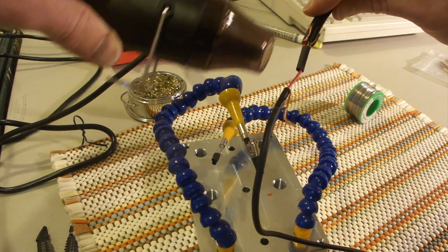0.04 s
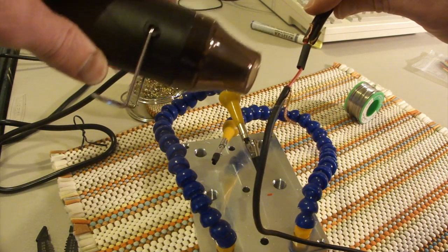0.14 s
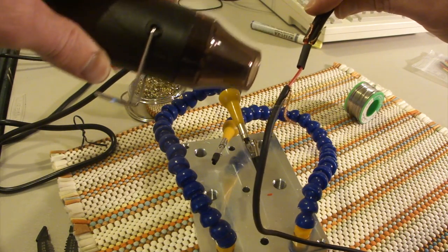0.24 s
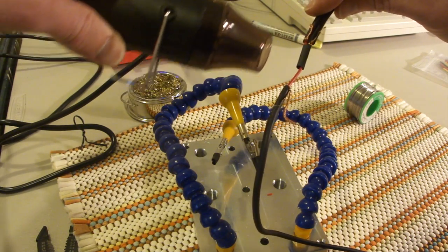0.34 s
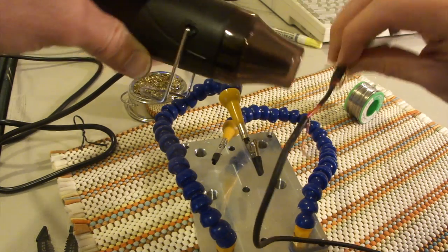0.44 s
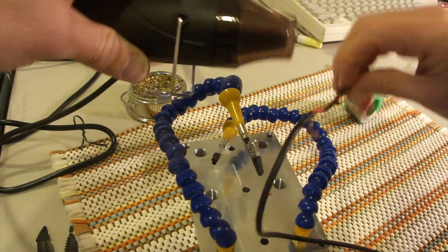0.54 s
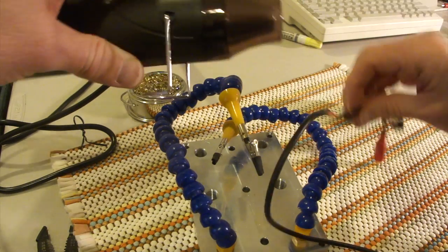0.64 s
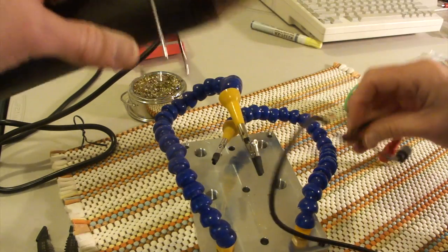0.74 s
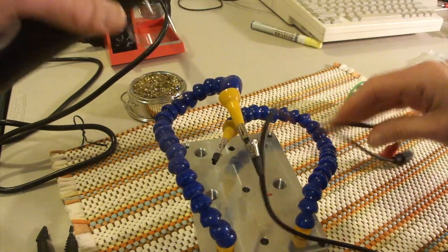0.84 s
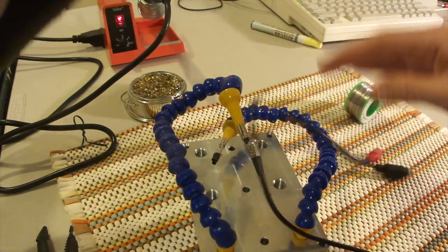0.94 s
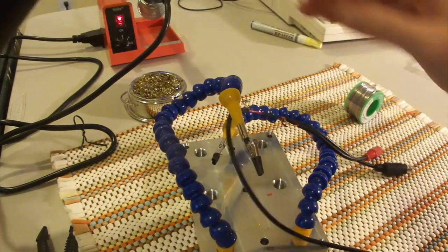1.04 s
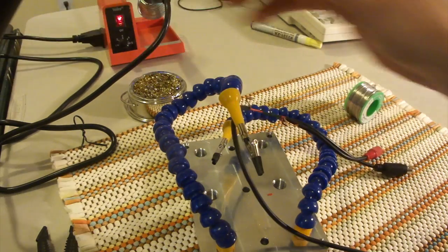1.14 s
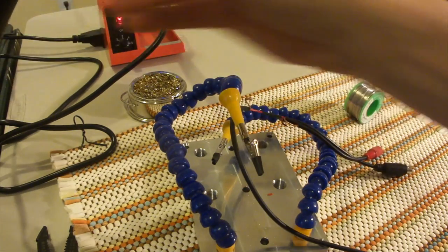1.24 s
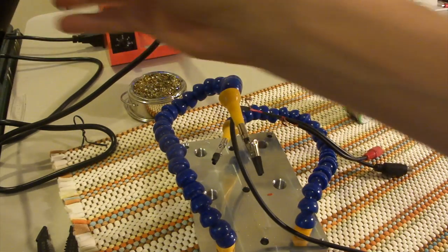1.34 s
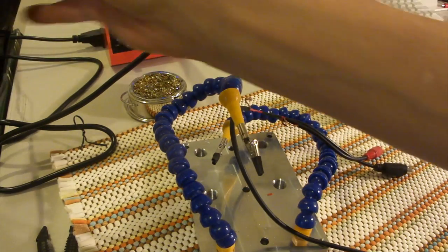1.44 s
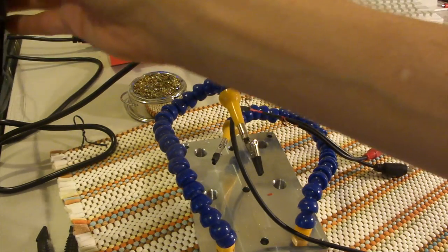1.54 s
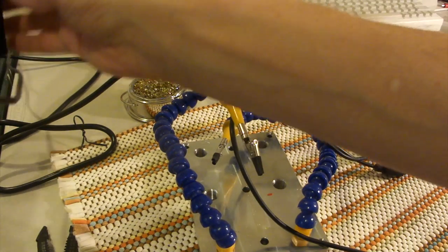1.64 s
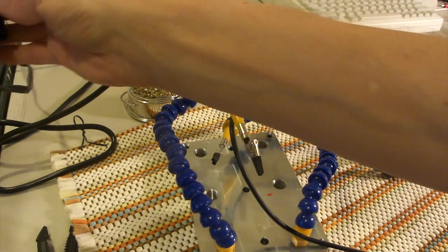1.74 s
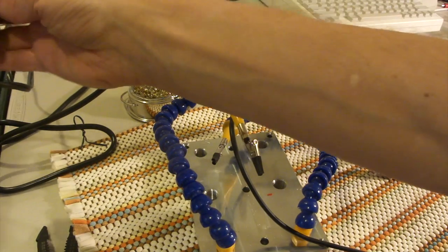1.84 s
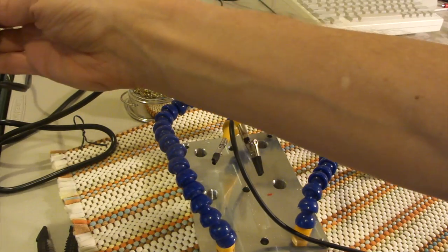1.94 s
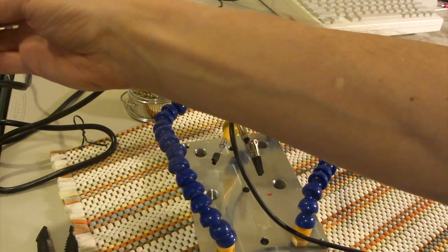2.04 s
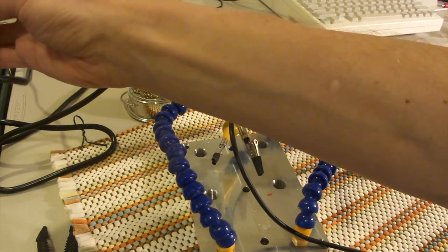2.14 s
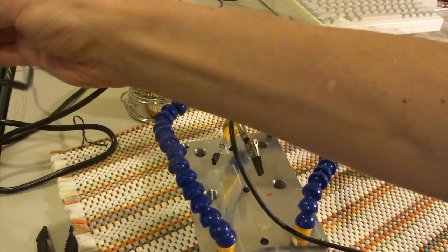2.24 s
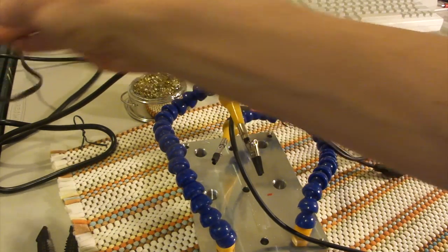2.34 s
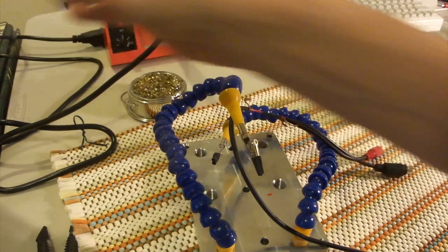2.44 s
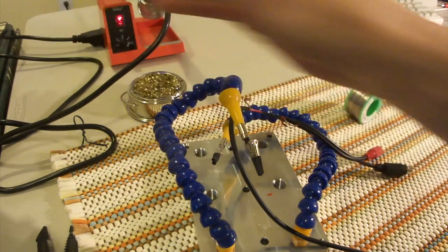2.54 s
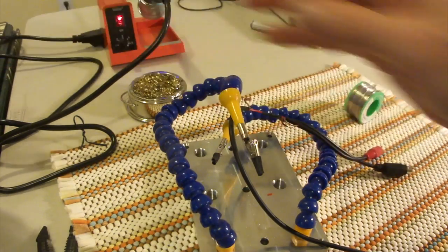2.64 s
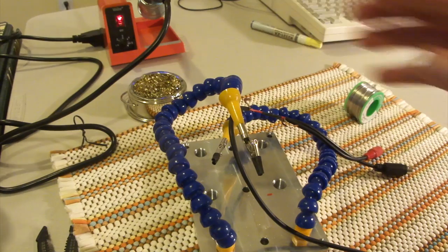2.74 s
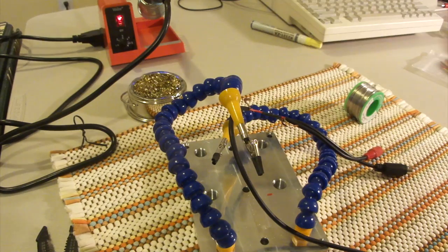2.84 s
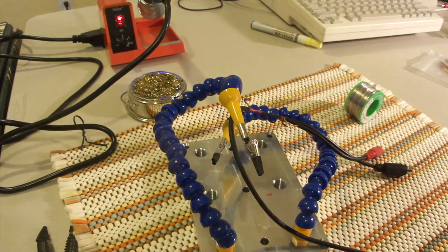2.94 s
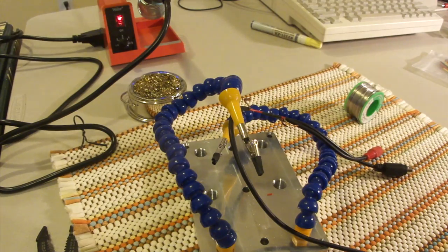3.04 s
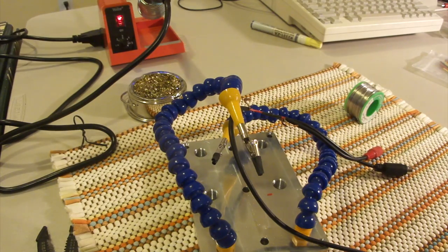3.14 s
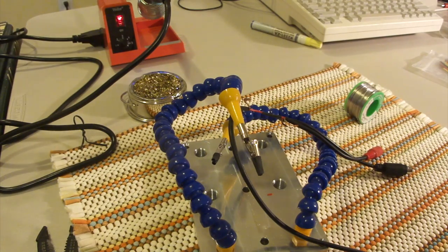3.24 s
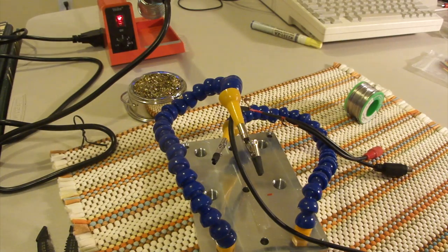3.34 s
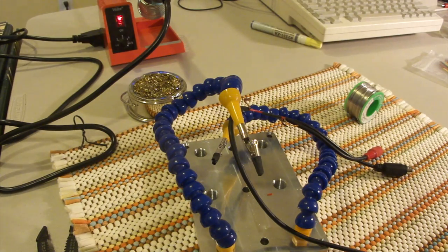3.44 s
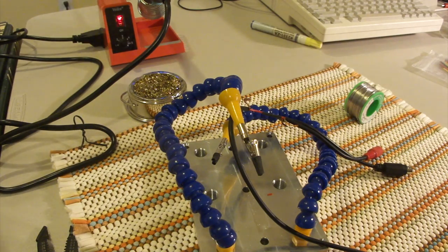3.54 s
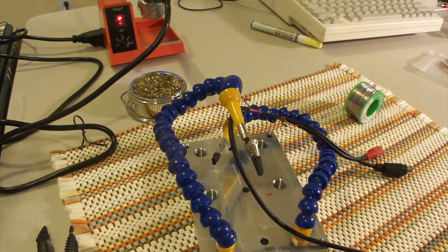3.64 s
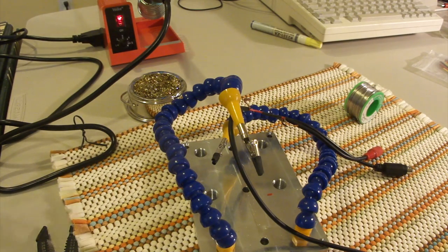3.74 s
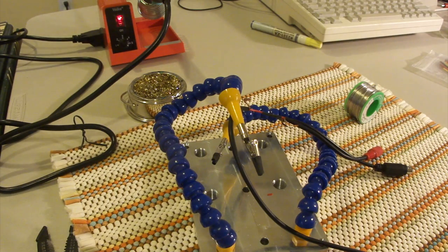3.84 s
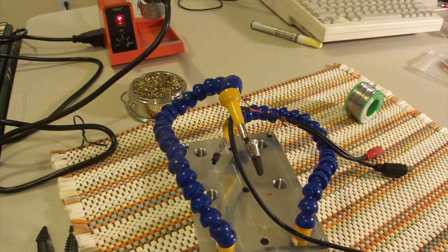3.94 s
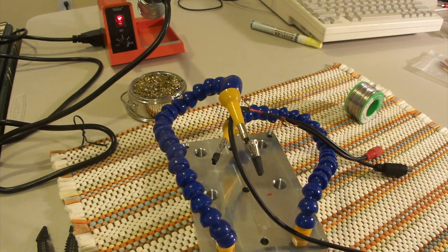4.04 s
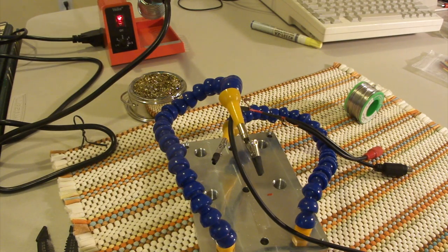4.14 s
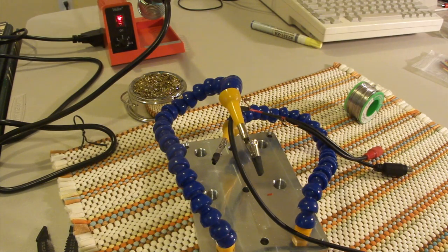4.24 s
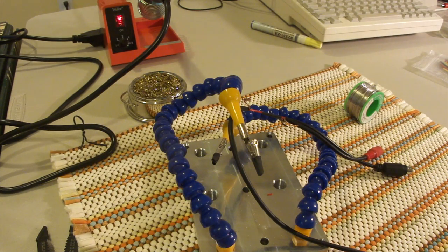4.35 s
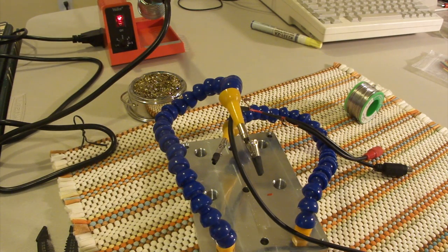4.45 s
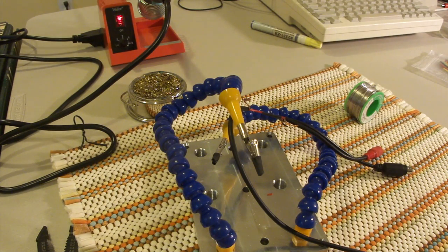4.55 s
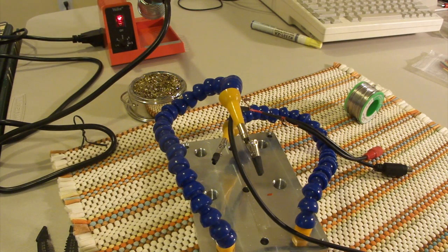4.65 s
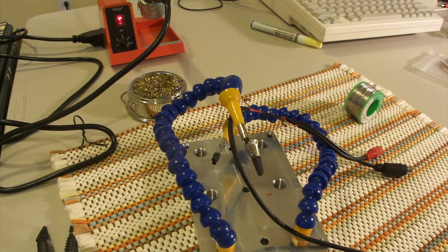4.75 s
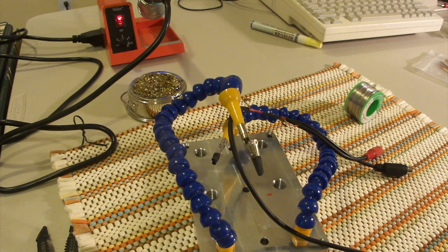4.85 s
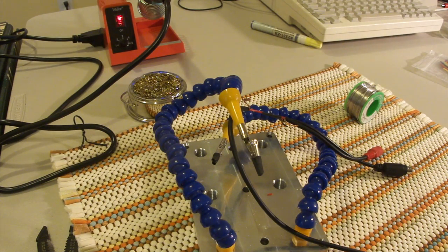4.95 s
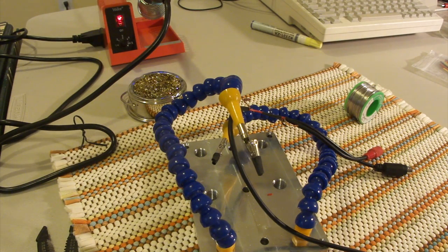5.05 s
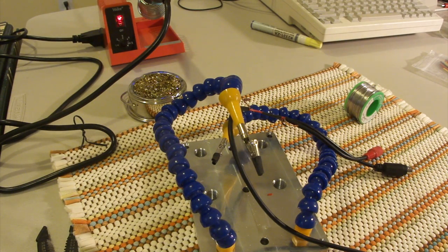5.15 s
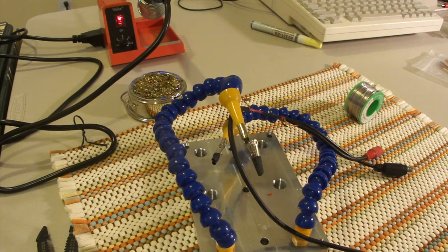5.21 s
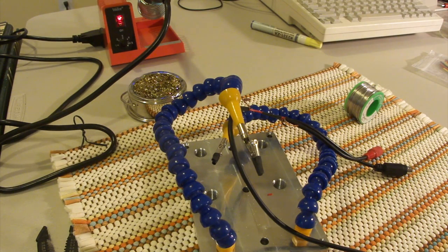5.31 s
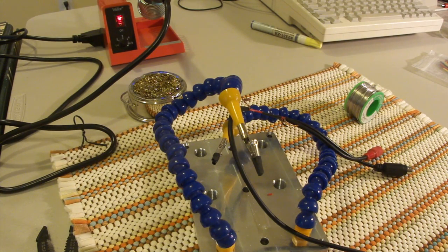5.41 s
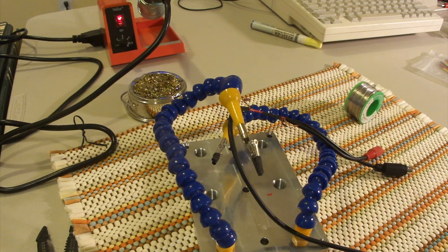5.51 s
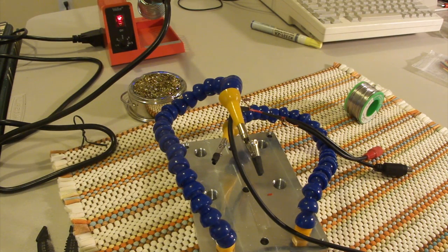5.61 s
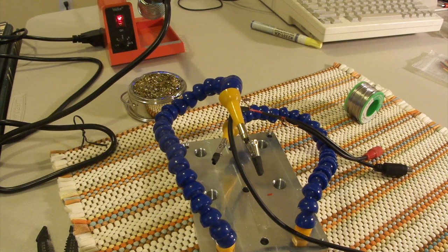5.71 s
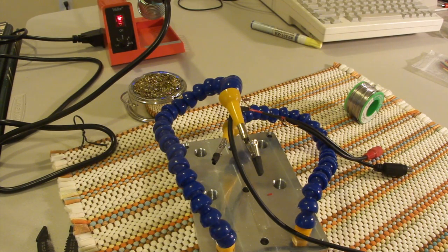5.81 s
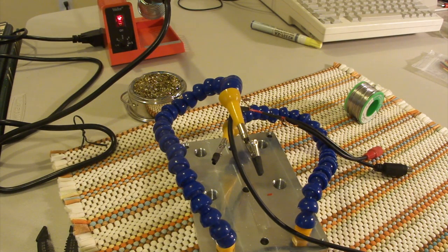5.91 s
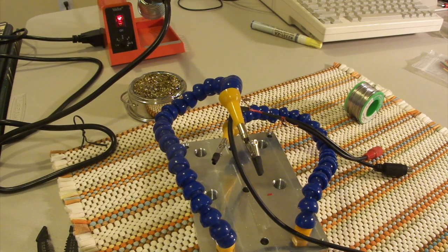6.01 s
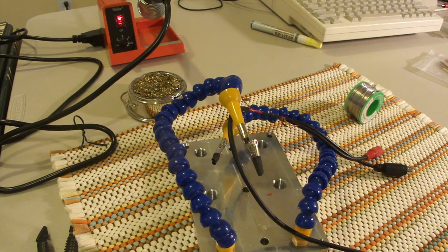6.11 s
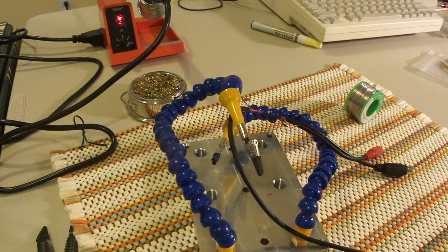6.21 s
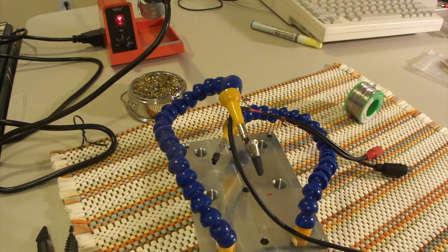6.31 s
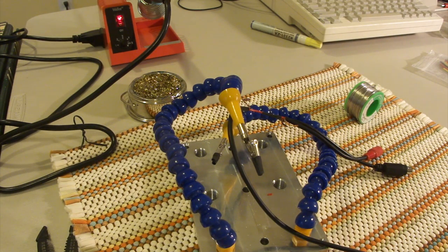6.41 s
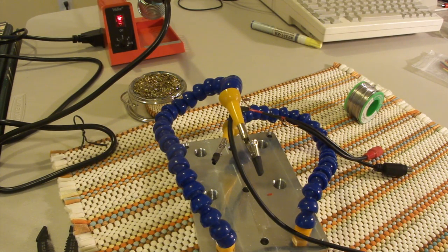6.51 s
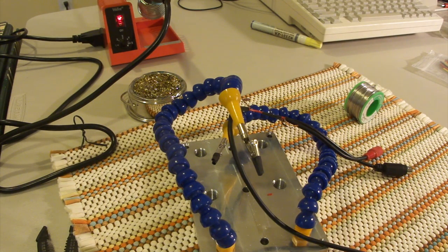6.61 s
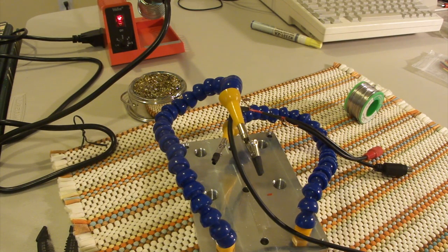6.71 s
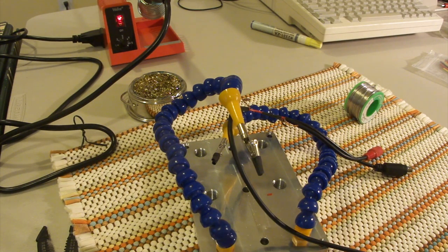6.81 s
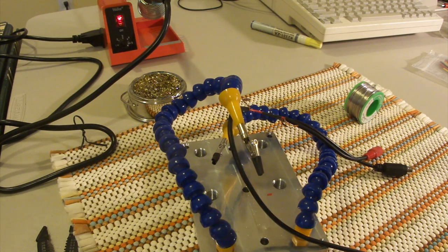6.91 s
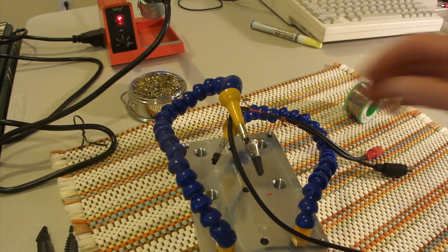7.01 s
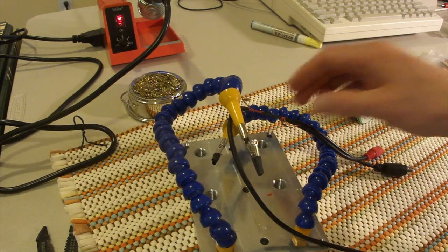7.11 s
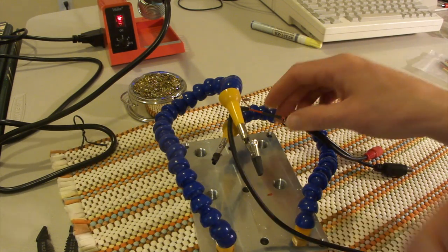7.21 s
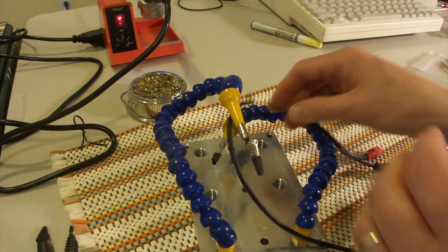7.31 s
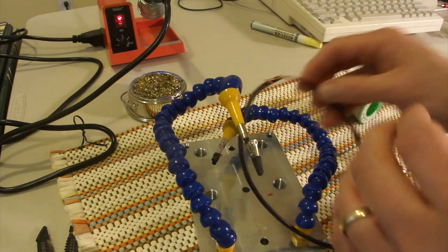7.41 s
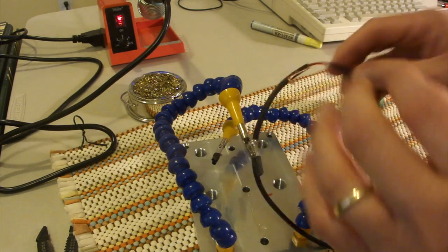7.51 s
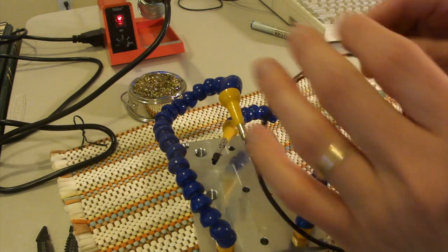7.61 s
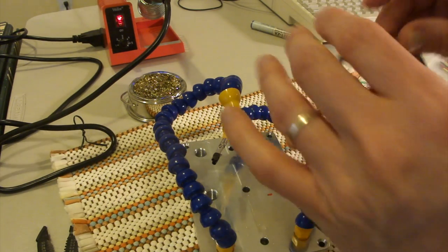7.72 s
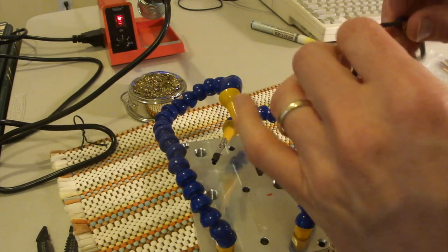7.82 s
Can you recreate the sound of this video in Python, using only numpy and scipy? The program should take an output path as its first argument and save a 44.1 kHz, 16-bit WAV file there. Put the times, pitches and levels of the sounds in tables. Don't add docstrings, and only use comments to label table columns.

```python
import sys
import numpy as np
from scipy import signal
from scipy.fft import rfft, irfft, next_fast_len
from scipy.io import wavfile
from scipy.ndimage import uniform_filter1d, minimum_filter1d

SR = 44100
rng = np.random.default_rng(int(sys.argv[2]) if len(sys.argv) > 2 else 0)


def output_pcm(signal):
    pcm = np.clip(np.atleast_2d(signal).T, -1, 1) * 32767
    wavfile.write(sys.argv[1], SR, np.round(pcm).astype(np.int16))


def invert_db(level):
    return 10 ** (np.asarray(level, dtype=float) / 20)


N = 346999
T = np.arange(N) / SR
FAST = next_fast_len(N)
GUN_N = int(2.85 * SR)

# multiple of shaft speed, level in dB.
SHAFT_ORDERS = [(1, -8.5), (2, -2.5), (3, -4), (4, -5), (6, -4.5), (7, -6)]
# multiple of shaft speed, level in dB.
BRUSH_ORDERS = [(12, -15), (20, 3.5), (24, 4), (25, 2), (26, -0.5), (27, -1), (29, 5.5), (30, 10), (31, 8),
                (33, 8), (35, 12), (37, -2), (41, 7), (45, 16.5)]
# centre in Hz, width in Hz, gain in dB.
DUCT_MODES = [(1500, 260, 0), (1090, 220, 1.5), (2300, 500, -12)]
# time in seconds, level in dB.
BEAM = [(0, -37.5), (.5, -32), (.54, -21.5), (.93, -18), (1.07, -30), (1.36, -24.5), (1.5, -36.5),
        (2.15, -36.5), (2.2, -26)]
# time in seconds, housing roar in dB.
INTAKE = [(0, -24), (.4, -24.5), (.7, -26.5), (1.0, -28), (1.45, -25), (1.7, -27.5), (1.9, -27),
          (2.17, -29)]
# time in seconds, share turned aside from 0 to 1.
ASIDE = [(0, 0.1), (.45, 0.), (.6, 0.53), (.9, 0.38), (1.1, 0.87), (1.45, 0.62), (1.8, 1), (2.1, 1.01),
         (2.75, 0.8)]
# centre in Hz, width in Hz, level in dB, change when turned aside in dB.
HOUSING = [(286, 220, -19, -0.5), (458, 85, -16.5, -5), (630.3, 94, 0, -0.5), (725.3, 110, 1.5, 0.5),
           (957, 420, -1, 1.5)]
# centre in Hz, width in Hz, level in dB, change when turned aside in dB.
BARREL = [(1391, 160, -5, 0), (1533, 330, -3.5, 1.5)]
# centre in Hz, width in Hz, level in dB, change when turned aside in dB.
NOZZLE = [(1750, 370, -5, 6), (2050, 180, 4, -8), (2600, 500, -2, 5)]
# centre in Hz, width in Hz, level in dB, change when turned aside in dB.
JET = [(3500, 1500, -4.5, -1), (6080, 2400, -1.5, 4), (8100, 2500, -1, 0), (10330, 2500, 2, 1.5)]
# start in seconds, peak in dB, treble against body in dB, body in Hz,
# ring T60 in seconds.
CLICKS = [
    (2.169, -7.5, -1, 2035, 0.026),
    (2.5305, -17.5, -26, 1750, 0.058),
    (2.532, -24, -40, 785, 0.044),
    (2.684, -31.5, -36, 883, 0.05),
    (2.686, -31, -34, 2500, .05),
    (5.0235, -21, -28, 2050, 0.028),
    (5.033, -30.5, -17, 1530, 0.027),
]
# start in seconds, peak in dB, treble in dB,
# brightness in dB per octave.
SET_DOWN = [(3.0711, -23, 0, -4), (3.0725, -12, 8, 2.5), (3.081, -18.5, -10, -3.5), (3.091, -22, -20, -4),
            (3.103, -20, -20, 0.5), (3.118, -23.5, -18, -2), (3.134, -26, -24, 0), (3.227, -24, -2, 7),
            (3.2415, -0.6, -4.5, 3), (3.253, -4, -6, 3), (3.262, -5.5, -3, 2), (3.271, -5, -16, -1.5),
            (3.285, -12, -20, -2), (3.305, -12.5, -25, -0.5), (3.32, -20.5, -26, 2),
            (3.331, -19.5, -21, -4)]
# frequency in Hz, level in dB, T60 in seconds.
TIP_MODES = [(200, -7.5, 0.11), (298, -20, 0.081), (364, -5, 0.11), (465, -4.5, 0.073), (660, -8, 0.064),
             (860, -10, 0.05), (1134, 1.5, 0.022), (1230, 5, 0.029), (1306, -7, .06), (1460, -7, .05),
             (1750, -13, .04), (2000, -10.5, .03)]
# frequency in Hz, level in dB, T60 in seconds.
BODY_MODES = [(318, -18.5, 0.1), (462, -4.5, 0.093), (519, -5.5, 0.1), (581, -9, 0.11), (663, 3.5, 0.083),
              (736, -9, 0.052), (911, -12, 0.07), (1020, -1, 0.055), (1140, 4.5, 0.035), (1348, -2, 0.043),
              (1540, -15, .04), (1790, -15.5, 0.04), (1950, -7.5, 0.05), (2280, -12.5, 0.03)]
# start in seconds, peak in dB, treble against body in dB, body in Hz,
# ring T60 in seconds.
TAPS = [(4.29, -36, -36.5, 1700, 0.16), (4.297, -34, -40, 1100, 0.15), (4.302, -38, -45, 330, .15),
        (4.321, -30, -46, 527, 0.11), (4.406, -37, -33, 1750, .12), (4.411, -30.5, -36, 537, 0.1),
        (4.416, -35.5, -40, 1140, 0.1), (4.425, -39, -40, 1700, 0.11), (4.503, -36, -39, 524, 0.11),
        (4.562, -29, -23.5, 1820, 0.13), (4.569, -36, -30, 600, .12), (4.585, -35, -29, 1800, .15),
        (4.71, -42, -40, 724, .1), (4.776, -39, -40, 619, .1), (4.869, -36.5, -36, 495, .12),
        (5.341, -27.5, -28.5, 1520, 0.19), (5.586, -39, -40, 546, 0.11), (5.605, -33.5, -21.5, 570, 0.3),
        (5.612, -37, -40, 300, 0.23), (5.62, -36, -32, 1050, 0.33), (5.974, -33, -29, 1140, 0.25),
        (6.06, -41, -45, 1117, 0.22), (6.337, -43, -40, 724, .1), (6.419, -45.5, -33, 530, 0.2)]
# start in seconds, peak in dB, treble against body in dB,
# body in Hz, left minus right in dB.
TICKS = [(6.8838, -31.5, -19, 1306, -6), (6.8872, -41, -7, 1500, -3), (6.9134, -47, -5, 1260, 2),
         (6.9484, -46, -2, 1320, 2.5), (6.97, -38, -14, 1290, -2.0), (7.0756, -36.5, -24, 1970, -2),
         (7.238, -38, -19, 1680, -1), (7.2973, -24, -17, 2230, -12), (7.443, -41.5, -14.5, 1700, 0.5),
         (7.4654, -38, -33.5, 2040, -11.5), (7.5408, -33, -37, 1950, -9), (7.6922, -35.5, -30, 900, -2.0),
         (7.711, -37, -17, 1630, 0), (7.7194, -33.5, -25.5, 1410, -1.5)]
# loudest moment in seconds, level in dB, seconds to fade 20 dB either
# side, dull part in dB, treble part in dB.
STROKES = [(4.45, -38, 0.03, -4, -28), (4.87, -42, 0.42, 6.5, -22), (5.04, -36.5, 0.11, -3, -26),
           (6.37, -43, 0.1, -2, -32), (6.92, -58, 0.04, -7, 4), (7.14, -34, 0.09, -10, -35),
           (7.7, -66, 0.5, -1, -14)]
# start in seconds, peak in dB.
LENS_TICKS = [(3.5912, -54), (3.6254, -58), (3.7244, -56), (3.7574, -53), (3.8242, -55), (3.8911, -56),
              (4.0243, -53.5), (4.0916, -50.5), (4.1748, -49)]
# start in seconds, centre in Hz, width in Hz, level in dB.
FOCUS_HISS = (3.5, 9049.5, 598.5, -47)
# frequency in Hz, level in dB.
HUM = [(119, -54.5), (141, -75.5), (240, -59.5), (600, -61.5), (719, -57), (1153, -57.5), (7881, -56.5),
       (13000, -51), (13980, -49)]
# frequency in Hz, level in dB.
ROOM_TONE = [(30, -10.5), (100, 6.5), (400, 1), (1500, 0), (6000, -5), (14000, 1.5)]
# frequency in Hz, left-right correlation.
ROOM_LIKENESS = [(60, 0), (150, 1), (400, 0.63), (2000, 0.58), (4500, 0), (9000, 0)]
# frequency in Hz, gain in dB.
MIC = [(25, -28.5), (80, -23.5), (115, -9), (250, 0.5), (1000, -1), (1800, -3.5), (2300, -9), (2800, -19.5),
       (4000, -28), (5600, -18), (8500, -21), (10300, -30), (11600, -39), (15500, -51)]
# centre in Hz, width in Hz.
NOTCHES = [(3000, 225), (4000, 200), (5000, 377)]

LOADED_HZ, FREE_HZ, SWING_S, SWING_LEN_S = 298.1, 309.5, 0.52, 0.036
SWITCH_S, COAST_TAU_S, FRICTION_HZ = 2.185, 0.48, 80.3
BLADE_LAW_DB, UPPER_LAW_DB, ORDERS_LAW_DB = 55.5, 30, 95
HOUSING_LAW_DB, BARREL_LAW_DB, NOZZLE_LAW_DB, JET_LAW_DB = 37.5, 44.5, 58.5, 47.5
BLADE_DB, UPPER_DB, ORDERS_DB, BRUSH_DB = 6.5, -31, -36.5, -39.5
BARREL_DB, BARREL_PER_BEAM, NOZZLE_DB, SPILL_DB = -23.5, 0.15, -22, -36.5
JET_DB, JET_ASIDE_DB = -20, 3.5
TICK_T60_S, TAP_PAN_DB, CLICK_PAN_DB = 0.027, -0.8, 0.9
ROOM_T60_S, ROOM_TREBLE_T60_S, ROOM_TONE_DB = 0.34, 0.29, -34.5
GATE_DB, GATE_SCATTER_DB = -12.5, 3


def on_log(table, hz):
    f, v = np.transpose(table)
    return np.interp(np.log(hz + 1), np.log(f), v)


def unit(x):
    return x / np.sqrt(np.mean(x ** 2))


def walk(rate_hz):
    step = T * rate_hz
    levels = rng.standard_normal(int(step[-1]) + 2)
    k = step.astype(int)
    ramp = step - k
    smooth = ramp ** 2 * (3 - 2 * ramp)
    return 1.2 * (levels[k] + (levels[k + 1] - levels[k]) * smooth)


def resonate(x, hz, width_hz):
    return signal.lfilter(*signal.iirpeak(hz, hz / width_hz, fs=SR), x)


def resonate_twice(x, hz, width_hz):
    return resonate(resonate(x, hz, width_hz), hz, 2 * width_hz)


def place(x, pan_db, lag_samples):
    delay = np.exp(-2j * np.pi * np.fft.rfftfreq(FAST) * lag_samples)
    late = irfft(rfft(x, FAST) * delay, FAST)[:N]
    return np.array([x * invert_db(pan_db / 2), late * invert_db(-pan_db / 2)])


def speed():
    t = T[:GUN_N]
    swung = np.clip((t - SWING_S) / SWING_LEN_S + 0.5, 0, 1)
    running_hz = LOADED_HZ + (FREE_HZ - LOADED_HZ) * swung
    drag = np.exp(-np.maximum(t - SWITCH_S, 0) / COAST_TAU_S)
    hz = np.maximum((running_hz + FRICTION_HZ) * drag - FRICTION_HZ, 1)
    return hz, np.log10(hz / running_hz)


def fan():
    t = T[:GUN_N]
    shaft_hz, slowed = speed()
    phase = 2 * np.pi * np.cumsum(shaft_hz * (1 + 0.0015 * walk(20)[:GUN_N])) / SR
    beam_db = np.interp(t, *np.transpose(BEAM))
    blade_db = beam_db + BLADE_LAW_DB * slowed + BLADE_DB + 1.1 * walk(30)[:GUN_N]
    out = invert_db(blade_db) * np.sin(5 * phase)
    for order, db in (6, -3), (10, 9), (15, 4), (17, -3), (21, 4):
        duct = sum(invert_db(g) / (1 + (2 * (order * shaft_hz - hz) / w) ** 2) for hz, w, g in DUCT_MODES)
        upper_db = UPPER_DB + UPPER_LAW_DB * slowed + db + 1.6 * walk(25)[:GUN_N]
        out += duct * invert_db(upper_db) * np.sin(order * phase)
    current = np.clip((SWITCH_S - t) / 0.01, 0, 1)
    orders_level = invert_db(ORDERS_DB + ORDERS_LAW_DB * slowed)
    brush_level = invert_db(BRUSH_DB) * current
    for table, level in (SHAFT_ORDERS, orders_level), (BRUSH_ORDERS, brush_level):
        for order, db in table:
            waver = invert_db(db + 2.2 * walk(8.04)[:GUN_N])
            out += level * waver * np.sin(order * phase + 6 * rng.random())
    return np.pad(out, (0, N - GUN_N))


def cavities(peaks, flicker_db):
    aside = np.interp(T[:GUN_N], *np.transpose(ASIDE))
    out = np.zeros(GUN_N)
    for hz, width_hz, db, change_db in peaks:
        level = invert_db(db + aside * change_db + flicker_db * walk(12)[:GUN_N])
        out += level * unit(resonate_twice(rng.standard_normal(GUN_N), hz, width_hz))
    return unit(out)


def air():
    t, slowed = T[:GUN_N], speed()[1]
    intake_db, beam_db, aside = (np.interp(t, *np.transpose(c)) for c in (INTAKE, BEAM, ASIDE))

    def padded(x):
        return np.pad(x, (0, N - GUN_N))

    barrel_db = BARREL_DB + BARREL_PER_BEAM * (beam_db + 29.5) + BARREL_LAW_DB * slowed
    near = invert_db(intake_db + HOUSING_LAW_DB * slowed) * cavities(HOUSING, 1.4)
    near += invert_db(barrel_db) * cavities(BARREL, 2.4)
    near += invert_db(NOZZLE_DB + NOZZLE_LAW_DB * slowed) * cavities(NOZZLE, 1.2)
    jet_level = invert_db(JET_DB + JET_ASIDE_DB * aside + JET_LAW_DB * slowed)
    core, left, right = (padded(jet_level * cavities(JET, 1.0)) for _ in range(3))
    spill = padded(invert_db(SPILL_DB + NOZZLE_LAW_DB * slowed) * cavities(NOZZLE, 1.2)) * np.array([[1], [-1]])
    return place(padded(near), -0.2, 0.7) + spill + place(core, 0.4, 1.18) + 0.77 * np.array([left, right])


def strikes(table, crack_s, crack_hz, crack_width_hz, spread, attack_s, contact, bench, bench_hz):
    out, t = np.zeros((2, N + SR)), T[:SR // 3]
    rise = np.minimum((t + 1 / SR) / attack_s, 1)
    for s, db, treble_db, hz, t60_s, pan_db in table:
        grit = rng.standard_normal((2, len(t)))
        grit[:, 0] += 3.0
        push = grit[0] * invert_db(-60 * t / (contact * t60_s)) * rise
        part = resonate_twice(push, hz, spread * hz)
        wood = resonate(resonate(push, bench_hz, 1.1 * bench_hz), bench_hz, 1.4 * bench_hz)
        body = part / abs(part).max() + bench * wood / abs(wood).max()
        crack = resonate_twice(grit[1] * invert_db(-60 * t / crack_s) * rise, crack_hz, crack_width_hz)
        blow = body + invert_db(treble_db + 31.5) * crack / abs(crack).max()
        i = int(s * SR)
        out[:, i:i + len(t)] += invert_db(db + 2.0 + np.array([[pan_db], [-pan_db]]) / 2) * blow
    return out[:, :N]


def switch_clicks():
    return strikes([(*c, CLICK_PAN_DB) for c in CLICKS],
                   crack_s=0.0052, crack_hz=8400.0, crack_width_hz=3600.0, spread=0.41,
                   attack_s=0.0005, contact=0.92, bench=0.92, bench_hz=1600.0)


def set_down():
    out, t = np.zeros(N + SR), T[:SR // 2]
    for s, db, treble_db, bright_db in SET_DOWN:
        modes = TIP_MODES if s < 3.2 else BODY_MODES
        shares = invert_db(1.6 * rng.standard_normal(len(modes)))
        ring = np.zeros(len(t))
        for (hz, mode_db, t60_s), share in zip(modes, shares):
            level_db = mode_db + bright_db * np.log2(hz / 800) - 60 * t / t60_s
            ring += share * invert_db(level_db) * np.cos(2 * np.pi * hz * t)
        ring *= invert_db(31.64 * uniform_filter1d(rng.standard_normal(len(t)), size=150))
        ring *= np.minimum(t / 0.00094, 1) ** 2
        ring *= 0.39 / np.sqrt(np.mean(ring[:400] ** 2))
        rattle = rng.standard_normal(len(t))
        thud = 0.13 * unit(resonate(rattle, 1200.0, 910.0)) * invert_db(-60 * t / 0.085)
        crack_decay = invert_db(-60 * t / 0.0077) + 0.39 * invert_db(-60 * t / 0.14)
        crack = invert_db(treble_db) * resonate(rattle, 6300.0, 10500.0) * crack_decay
        i = int(s * SR)
        out[i:i + len(t)] += invert_db(db) * (ring + thud + crack)
    return place(out[:N], 0.1, 1.17)


def tool_taps():
    return strikes([(*c, TAP_PAN_DB) for c in TAPS],
                   crack_s=0.28, crack_hz=5600.0, crack_width_hz=9700.0, spread=0.25,
                   attack_s=0.0019, contact=0.82, bench=0.8, bench_hz=1350.0)


def wire_ticks():
    return strikes([(*c[:-1], TICK_T60_S, c[-1]) for c in TICKS],
                   crack_s=0.0088, crack_hz=7940.0, crack_width_hz=6500.0, spread=0.31,
                   attack_s=0.00032, contact=0.93, bench=1.0, bench_hz=2300.0)


def rustle():
    grains = rng.standard_normal(N) * invert_db(1.4 * walk(80))
    dull = unit(resonate(grains, 550.0, 370.0))
    mid = unit(resonate(grains, 1400.0, 1900.0))
    treble = unit(resonate(grains, 7000.0, 6000.0))
    out = np.zeros(N)
    for s, db, fade_s, dull_db, treble_db in STROKES:
        swell = invert_db(db - 5.0 - 20 * abs(T - s) / fade_s)
        out += swell * (mid + invert_db(dull_db) * dull + invert_db(treble_db + 25) * treble)
    return place(out, -0.64, 0.0)


def room(x):
    t = T[:SR // 2]
    tail = rng.standard_normal((2, 2, len(t)))
    low = signal.lfilter(*signal.butter(2, 2500.0, fs=SR), tail[0])
    high = signal.lfilter(*signal.butter(2, 2500.0, "high", fs=SR), tail[1])
    echo = low * invert_db(-60 * t / ROOM_T60_S) + high * invert_db(-60 * t / ROOM_TREBLE_T60_S)
    echo = echo * np.clip((t - 0.004) / 0.003, 0, 1)
    shared = echo[0]
    echo = (shared + 0.47 * echo) / np.sqrt(np.sum(shared ** 2))
    return signal.fftconvolve(x, echo, axes=-1)[:, :N]


def lens():
    push = np.zeros(N)
    for s, db in LENS_TICKS:
        push[int(s * SR)] = invert_db(db + 43.0)
    start_s, hz, width_hz, db = FOCUS_HISS
    band = resonate(resonate(rng.standard_normal((2, N)), hz, width_hz), hz, width_hz)
    hiss = unit(band) * invert_db(db + 1.3 * walk(3.2)) * (T > start_s)
    return resonate(push, 4900.0, 2500.0) + hiss


def workshop():
    hz = np.fft.rfftfreq(FAST, 1 / SR)
    like = on_log(ROOM_LIKENESS, hz)
    mid, side = rfft(rng.standard_normal((2, FAST))) * invert_db(on_log(ROOM_TONE, hz))
    ports = np.sqrt(1 + like) * mid + np.sqrt(1 - like) * side * np.array([[1], [-1]])
    tone = irfft(ports, FAST)[:, :N]
    hum = np.zeros(N)
    for hum_hz, db in HUM:
        hum += invert_db(db + 2.0 * walk(3.7)) * np.sin(2 * np.pi * hum_hz * T + 1.3 * walk(3))
    return invert_db(ROOM_TONE_DB + 0.5 * walk(1.83)) * unit(tone) + hum


def scene():
    gun = place(fan(), 0.2, 0.81) + air()
    clicks, knocks, taps, ticks = switch_clicks(), set_down(), tool_taps(), wire_ticks()
    sent = invert_db(-14.5) * gun + invert_db(-8) * clicks + invert_db(-20.0) * ticks + invert_db(-10.5) * taps + invert_db(-12.5) * knocks
    return gun + clicks + ticks + taps + knocks + rustle() + room(sent) + lens() + workshop()


def microphone(x):
    log_gain = np.log(invert_db(on_log(MIC, np.fft.rfftfreq(4096, 1 / SR))))
    causal = irfft(log_gain) * np.r_[1, 2 * np.ones(2047), 1, np.zeros(2047)]
    response = irfft(np.exp(rfft(causal)))[None, :2048]
    x = signal.fftconvolve(x, response, axes=-1)[:, :N]
    for hz, width_hz in NOTCHES:
        notch = signal.iirnotch(hz, hz / width_hz, fs=SR)
        x = signal.lfilter(*notch, signal.lfilter(*notch, x))
    return x


def band_gate(x):
    hz, _, z = signal.stft(x, SR, nperseg=1024)
    power = np.mean(abs(z) ** 2, axis=0)
    power = uniform_filter1d(uniform_filter1d(power, size=5, axis=0), size=3, axis=1)
    hiss = minimum_filter1d(np.mean(power[(hz > 8600) & (hz < 9500)], axis=0), size=7)
    wobble = np.repeat(rng.uniform(-1, 1, len(hiss) // 4 + 1), 4)[:len(hiss)]
    bar_db = GATE_DB + GATE_SCATTER_DB * wobble - 3.0 * (hz[:, None] < 6000)
    keep = (power > hiss * invert_db(2 * bar_db)) | (hz[:, None] < 2700)
    return signal.istft(z * keep, SR, nperseg=1024)[1][:, :N]


def roll_off(x):
    return signal.sosfilt(signal.butter(12, 15320, fs=SR, output="sos"), x)


def record(dry):
    mix = np.clip(band_gate(microphone(dry)), -1, 1)
    return roll_off(mix)


dry = scene()
out = record(dry)
output_pcm(out)
```